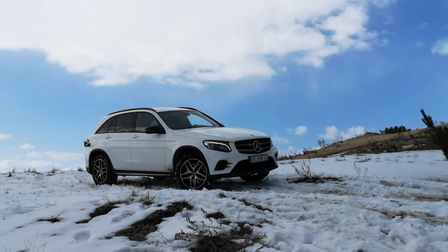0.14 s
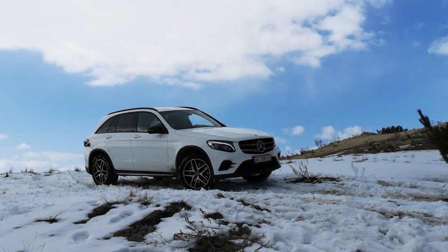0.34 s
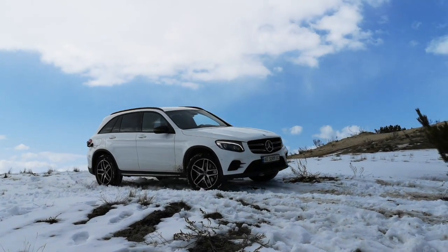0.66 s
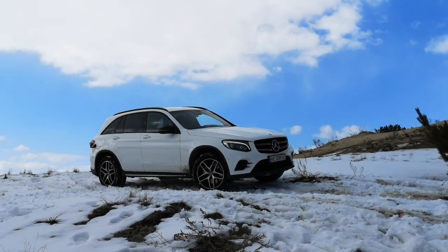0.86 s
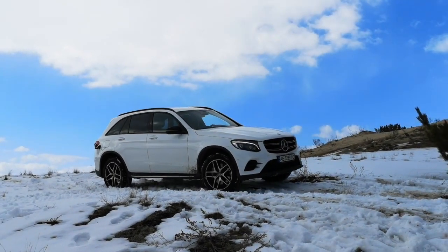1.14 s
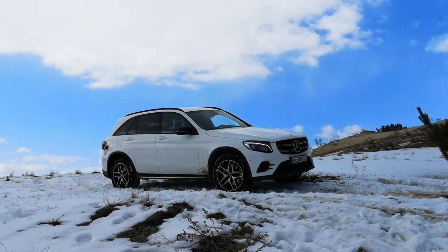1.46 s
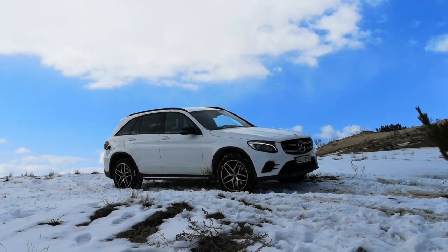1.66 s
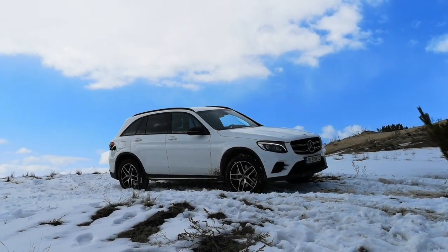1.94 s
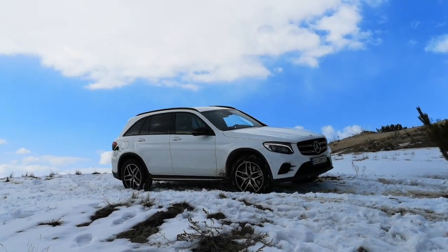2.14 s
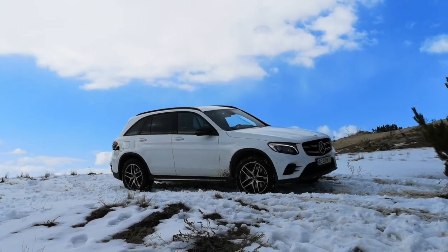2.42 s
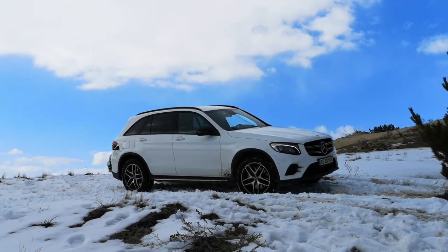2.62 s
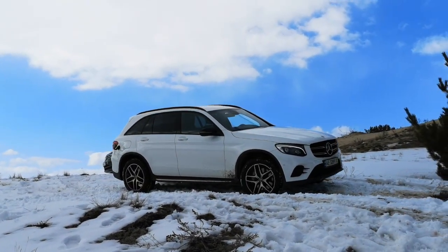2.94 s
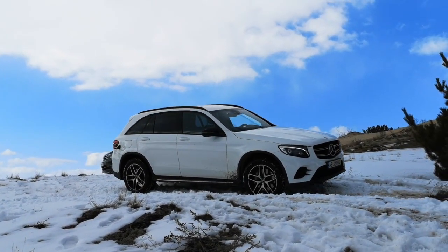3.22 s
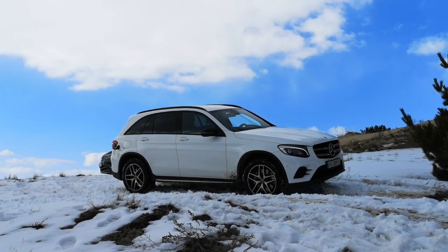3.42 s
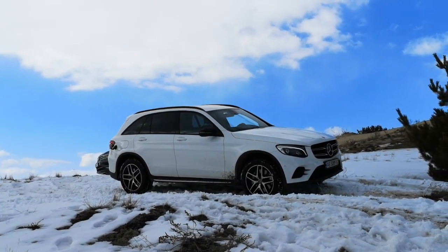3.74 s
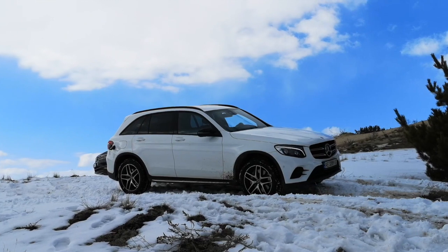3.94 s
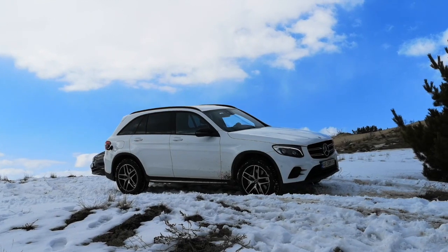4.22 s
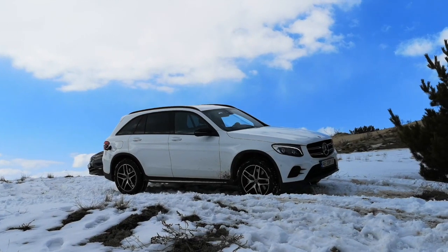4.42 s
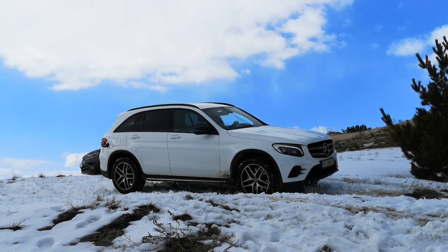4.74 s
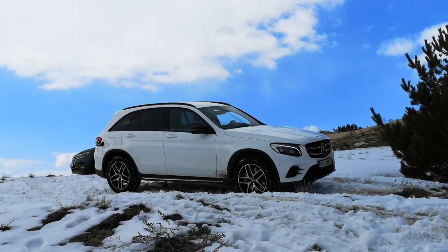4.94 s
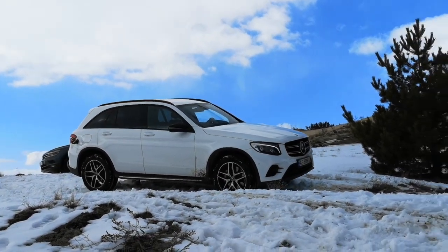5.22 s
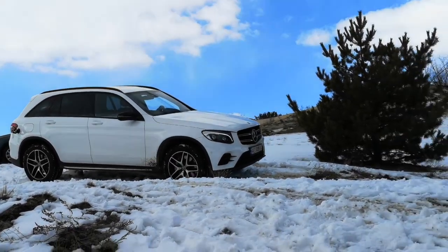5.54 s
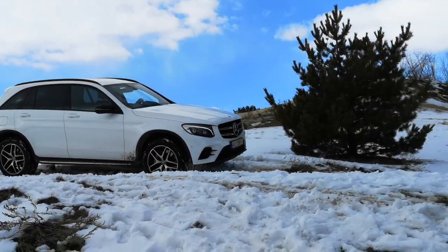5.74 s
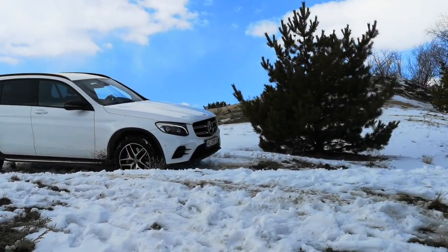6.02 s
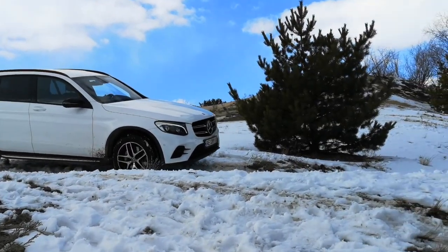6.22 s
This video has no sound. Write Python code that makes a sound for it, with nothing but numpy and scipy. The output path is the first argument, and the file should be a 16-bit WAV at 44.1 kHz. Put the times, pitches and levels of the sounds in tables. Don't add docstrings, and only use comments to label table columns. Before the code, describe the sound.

A diesel car idles with a throbbing exhaust and clatter on snow, wind buffets the microphone, and the engine revs briefly before more gusts.

```python
import sys
import numpy as np
from scipy import signal
from scipy.fft import rfft, irfft, next_fast_len
from scipy.io import wavfile
from scipy.ndimage import uniform_filter1d, map_coordinates

SR = 44100
rng = np.random.default_rng(int(sys.argv[2]) if len(sys.argv) > 2 else 0)


def elevation(decibels):
    levels = np.asarray(decibels, float)
    return 10 ** (levels / 20)


def store_wav(level_fs):
    pcm = np.round(np.clip(np.atleast_2d(level_fs), -1, 1) * 32767)
    wavfile.write(sys.argv[1], SR, pcm.T.astype(np.int16))


N = 280917

# (time [s], exhaust level [dB], how far abeam the bonnet is [0-1], knock hardness [dB])
ENGINE = [(0, -41.5, 0.37, -2), (.76, -43.5, 0.27, -4.5), (2, -45.5, 0, -3), (3, -46.5, 0, -4.5),
          (3.6, -45, 0, 0), (4.05, -48, 0.03, -3.5), (4.25, -44, 0, -1.5), (4.45, -42, 0, -6.5),
          (4.62, -57, 0, -4), (4.8, -46, 0, -1.5), (5.1, -53.5, 0.24, -3.5), (5.4, -52.5, 0.17, -5.5),
          (5.8, -47.5, 0.7, -3), (6.37, -47, 0.67, -3)]


def unit(x):
    return x / np.sqrt(np.mean(x ** 2) + 1e-20)


def along(points, hz):
    f, v = np.transpose(points)
    return np.interp(np.log(hz + 1), np.log(f + 1), v)


def curves(rows):
    s, *cols = np.transpose(rows)
    return [np.interp(np.arange(N) / SR, s, c) for c in cols]


def wobble(rate):
    coarse = np.arange(0, N + 32, 32)
    knots = rng.standard_normal(int(N * rate / SR) + 4)
    return np.interp(np.arange(N), coarse, map_coordinates(knots, [coarse * rate / SR]))


def filtered(x, response):
    m = next_fast_len(N + SR // 2)
    return irfft(rfft(x, m) * response(np.fft.rfftfreq(m, 1 / SR)), m)[..., :N]


def sides(db):
    return elevation(np.array([db / 2, -db / 2]))


def mode(f, centre, width):
    return 1j * f * width / (centre * centre - f * f + 1j * f * width)


def resonances(modes, lift_db):
    return lambda f: 1 + sum(elevation(db + lift_db) * mode(f, centre, width) for centre, width, db in modes)


def patches(depth_db):
    z = signal.stft(rng.standard_normal((2, N)), nperseg=512)[2]
    field = uniform_filter1d(rng.standard_normal(z.shape[1:]), size=3, axis=0)
    field = uniform_filter1d(field, size=8, axis=1)
    return signal.istft(z * elevation(depth_db * unit(field)), nperseg=512)[1][:, :N]


def ports(pair):
    # (frequency [Hz], left-right likeness [0-1])
    likeness = [(130, 0.81), (290, 0.6), (640, 0.51), (1410, 1), (2600, 0.57), (3400, 0.4), (6820, 0.013),
                (15000, 0.12)]
    # (frequency [Hz], left-right level [dB])
    lean = [(130, -17), (290, 4), (640, -9.5), (1410, 0), (2400, -8), (3600, 1), (6820, -1.5),
            (15000, -12.5)]
    # (frequency [Hz], phase by which left leads [rad])
    lead = [(100, -0.48), (600, -1.1), (1290, 0.86), (1810, -1), (2070, 0.0073), (2410, -1.1),
            (2670, -0.95), (4740, 1)]
    turn = lambda hz: np.arccos(np.clip(along(likeness, hz), -1, 1)) / 2
    mid, side = filtered(pair, lambda hz: np.array([np.cos(turn(hz)), np.sin(turn(hz))]))
    phase = lambda hz: np.exp(.5j * np.outer([1, -1], along(lead, hz)))
    skew = lambda hz: sides(along(lean, hz)) * phase(hz)
    return filtered(np.array([mid + side, mid - side]), skew)


def pushes():
    # (time [s], peak level [dB], width
    # [ms])
    gust_pushes = [(3.609, -44, 3.6), (3.625, -40, 3.8), (3.637, -38, 4.8), (4.288, -31.5, 3.9),
                   (4.307, -46, 3.2), (4.318, -36.0, 3.6), (4.36, -25, 3.8), (4.368, -24.5, 2.8),
                   (4.379, -41, 1.6), (4.386, -31, 3.0), (4.398, -34, 4.1), (4.412, -30.5, 3.0),
                   (4.424, -37.0, 4), (4.437, -28, 3.6), (4.451, -30.5, 3.9), (4.463, -25.0, 3.6),
                   (4.474, -31, 2.6), (4.487, -24.5, 4.2), (4.5, -37, 3.3), (4.515, -24.5, 5),
                   (4.541, -30.5, 3.6), (4.553, -50, 3.1), (4.574, -38, 4.2), (4.752, -42, 3.8),
                   (4.788, -53, 3.2), (4.826, -48, 3.7), (4.865, -52, 3.4), (5.284, -38.5, 4.1),
                   (5.338, -35.5, 3.1), (5.353, -43, 1.9), (5.368, -40, 2.3), (5.386, -40.0, 3.4),
                   (5.398, -39, 2), (5.418, -35.0, 4.4), (5.437, -31.5, 2.17), (5.445, -34.5, 2),
                   (5.464, -42, 2.3), (5.47, -33.5, 2.1), (5.481, -38, 3.1), (5.488, -30.5, 3.6),
                   (5.504, -30.5, 3.5), (5.523, -45, 2), (5.539, -40.0, 2.8), (5.554, -44, 3.0),
                   (5.565, -40.5, 2.7), (5.571, -31.5, 2.5), (5.582, -37.5, 2.4), (5.588, -34, 2.7),
                   (5.603, -34, 5.3), (5.619, -34.0, 2.9), (5.635, -34, 2.1), (5.646, -34.0, 2.6),
                   (5.662, -39, 4.4), (5.686, -45, 7.4), (5.7, -45, 3.5), (5.705, -33.5, 2.2),
                   (5.741, -28.5, 2.43), (5.765, -37.0, 2.8), (5.783, -30.0, 3.7), (5.793, -35, 2.2),
                   (5.806, -30.5, 3.2), (5.824, -31, 4.7), (5.837, -41, 3.0), (5.848, -38.0, 4.3),
                   (5.863, -39, 4.8), (5.872, -40, 4.6), (5.889, -31.5, 3.9), (5.9, -38, 3),
                   (5.918, -39.0, 1.9), (5.929, -33.5, 3.2), (5.943, -41, 3.6), (5.983, -42, 4.3),
                   (6.024, -44, 3.9), (6.062, -48, 4.2), (6.074, -38, 2.9), (6.09, -42.0, 3.6),
                   (6.101, -48, 6), (6.142, -37, 2.8), (6.164, -33, 2.5), (6.183, -29, 2.8),
                   (6.194, -40, 2.2), (6.206, -31.5, 3), (6.227, -31.5, 2.2), (6.233, -39.0, 1.9),
                   (6.245, -33, 3), (6.258, -36, 3), (6.263, -26, 2.63), (6.276, -39, 2), (6.281, -36, 2.3),
                   (6.302, -35.5, 2.5), (6.323, -36, 2.4), (6.342, -39, 2.4)]
    s, db, width_ms = np.array(gust_pushes).T[:, :, None]
    at = np.round(s * SR).astype(int) + np.arange(-SR // 40, SR // 40)
    u = (at / SR - s) / (width_ms * 0.00078)
    suction = -elevation(db - 1.0) * (1 - u * u) * np.exp(-u * u / 2)
    return np.bincount(at.ravel(), suction.ravel(), N + SR)[:N]


def thumps():
    # (time [s], peak level [dB], start pitch [Hz], 60 dB decay time [s])
    eddies = [(0.465, -34, 226, 0.044), (1.202, -23, 219, 0.031), (2.602, -56, 323, 0.3),
              (3.104, -41.5, 275, 0.067), (3.249, -43, 286, 0.071), (3.305, -32, 225, 0.027),
              (3.37, -38.5, 282, 0.082), (3.574, -33.5, 301, 0.1), (3.584, -25.5, 243, 0.045),
              (3.744, -26, 173, 0.042), (3.915, -28.5, 161, 0.061), (4.332, -21.5, 294, 0.07),
              (4.358, -28, 170, .04), (4.505, -45.5, 339, 0.51), (4.449, -31.5, 304, 0.16),
              (.562, -47, 304, 0.042), (3.035, -45, 280, .05), (3.125, -44.5, 233, 0.13)]
    out, t = np.zeros(N + SR), np.arange(SR // 3) / SR
    for s, db, hz, t60 in eddies:
        pitch = hz * (0.567 + 0.491 * np.exp(-t / 0.013))
        swell = elevation(-60 * t / t60) * (1 - np.exp(-(t / 0.0044) ** 2))
        out[round(s * SR):][:len(t)] += elevation(db - 2.5) * swell * np.sin(2 * np.pi * np.cumsum(pitch) / SR)
    return out[:N]


def wind():
    # (time [s], level [dB])
    strength = [(0, -83), (.35, -62), (.72, -64.5), (1.25, -64), (2.15, -69), (2.62, -66.5), (3.15, -62.5),
                (3.46, -70.5), (3.85, -61), (4.05, -81), (4.26, -61), (4.45, -45), (4.6, -63.5),
                (5.17, -54), (5.28, -60.5), (5.45, -50), (5.95, -58), (6.3, -63.5)]
    # (frequency [Hz], density [dB per Hz])
    buffet_spectrum = [(40, -2), (80, 4), (130, -1), (190, -5), (260, -11.5), (330, -29.5), (500, -61),
                       (800, -59.5)]
    # (frequency [Hz], density [dB per Hz])
    deep_spectrum = [(4, -11), (12, -2), (25, 4), (45, 15.5), (80, -14), (110, -25), (200, -76)]
    # (frequency [Hz], width [Hz], level [dB])
    cavity = [(178.7, 8.4, 5.5)]
    # (time [s], level [dB])
    small_eddies = [(0.0, -71), (0.075, -61.5), (0.15, -75.5), (0.29, -70), (0.5, -73.5), (0.82, -76.5),
                    (1.15, -70.5), (1.35, -76), (2.2, -80), (2.62, -67), (2.8, -82), (3.19, -71),
                    (3.39, -84), (4.17, -80), (4.43, -68), (4.72, -73.5), (5.9, -70), (6.37, -69)]
    # (frequency [Hz], density [dB per Hz])
    fine_spectrum = [(150, -40), (230, -6), (300, -0.5), (370, -2), (450, -18.5), (600, -13), (900, -67)]
    deep_in_breeze_db, deep_growth, breeze_db = -8, 1.25, -60
    buffet_db, = curves(strength)
    deep_db = deep_in_breeze_db + (deep_growth - 1) * (buffet_db - breeze_db)
    lumps = elevation(3.2 * wobble(24))
    buffet, stray = filtered(lumps * rng.standard_normal((2, N)), lambda hz: elevation(along(buffet_spectrum, hz)))
    deep = filtered(lumps * rng.standard_normal(N), lambda hz: elevation(along(deep_spectrum, hz)))
    both = elevation(buffet_db + 5.5) * (unit(buffet) + elevation(deep_db) * unit(deep)) + pushes()
    both = filtered(both, resonances(cavity, lift_db=-7.0))
    fine_lumps = elevation(3.7 * wobble(30)) * rng.standard_normal(N)
    fine = filtered(fine_lumps, lambda hz: elevation(along(fine_spectrum, hz)))
    both = both + elevation(curves(small_eddies)[0] - 1.0) * unit(fine)
    stray = filtered(unit(stray), lambda hz: np.minimum(0.07 + (hz / 140) ** 2, 2.5))
    stray = elevation(buffet_db - 20.5) * stray
    pair = both * elevation(np.array([[-.05], [.05]])) + np.outer([1, -1], stray)
    return pair + np.outer(sides(-1.5), thumps())


def snaps():
    # (time [s], peak level [dB], pitch [Hz], left-right level [dB])
    twigs = [
        (1.055, -57, 7100, -2.0),
        (1.388, -53, 9120, -8),
        (1.7194, -68, 4590, -1.5),
        (5.0095, -61, 8200, 0),
        (6.0097, -72, 7980, 0),
    ]
    out, t = np.zeros((2, N + SR)), np.arange(SR // 50) / SR
    for s, db, hz, pan_db in twigs:
        band = signal.butter(4, [0.7 * hz, 1.24 * hz], "bandpass", fs=SR, output="sos")
        noise = signal.sosfilt(band, rng.standard_normal((2, len(t))))
        tick = np.sin(2 * np.pi * hz * t) + 2.5 * noise
        swell = elevation(-60 * t / 0.012) * (1 - np.exp(-t / 0.00072))
        out[:, round(s * SR):][:, :len(t)] += elevation(db + 2.5) * sides(pan_db)[:, None] * swell * tick
    return out[:, :N]


def hard_pops():
    # (time [s], pop level [dB], spray level [dB], spray top [Hz])
    pop_rows = [
        (.505, -70, -43.5, 2480),
        (4.168, -68, -43.5, 2900),
        (4.403, -60, -37, 3000),
        (4.483, -62, -39, 3000),
        (4.937, -72, -45, 2580),
        (5.094, -68, -40, 2600),
        (6.0092, -50, -45, 2800),
        (6.1318, -33.5, -43.5, 7500),
    ]
    out, t = np.zeros((2, N + SR)), np.arange(SR // 40) / SR
    for s, pop_db, spray_db, top_hz in pop_rows:
        pop = (t / 0.0013 * np.exp(1 - t / 0.0013)) ** 2
        noise = rng.standard_normal(len(t)) + 0.7 * rng.standard_normal((2, len(t)))
        band = signal.butter(3, [1450, top_hz], "bandpass", fs=SR, output="sos")
        spray = unit(signal.sosfilt(band, noise)) * elevation(-60 * t / 0.022) * (1 - np.exp(-t / 0.00058))
        out[:, round(s * SR):][:, :len(t)] += elevation(pop_db) * pop + elevation(spray_db - 5.0) * spray
    return filtered(out[:, :N], lambda hz: 1j * hz / (120 + 1j * hz))


def squeak():
    # (time [s], length [s], start pitch [Hz], level [dB])
    chirps = [
        (2.583, .013, 6400, -68),
        (2.6, .008, 6250, -71),
        (2.612, 0.021, 6450, -70.5),
    ]
    rise_hz_per_s = 28000
    out = np.zeros((2, N))
    for s, length, hz, db in chirps:
        t = np.arange(round(length * SR)) / SR
        swell = np.sqrt(np.sin(np.pi * t / length))
        chirp = swell * np.sin(2 * np.pi * (hz + rise_hz_per_s * t / 2) * t)
        out[:, round(s * SR):][:, :len(t)] += elevation(db) * np.outer(sides(-8), chirp)
    return out


def whistle(hz, swells, flutter_db, flip):
    t = np.arange(N) / SR
    step = t[::32]
    level = 0
    for k, (s, width, *db) in enumerate(swells):
        swell = np.exp(-((step - s) / width) ** 2 / 2)
        level = level + flip ** k * np.outer(elevation(np.array(db)), swell)
    level = np.array([np.interp(t, step, port) for port in level])
    flutter = elevation(flutter_db * (wobble(35) + 0.18 * np.array([wobble(34.2), wobble(25)])))
    tone = np.sin(2 * np.pi * np.cumsum(hz + 5 * wobble(40)) / SR)
    return level * flutter * np.sqrt(2) * tone


def brakes():
    # (centre [s], width [s], left [dB], right [dB])
    high_swells = [(.87, 0.031, -94, -71), (1.04, .03, -97, -78), (1.2, 0.018, -89, -65),
                   (1.245, 0.026, -86, -54.5), (1.3, .012, -80, -56), (1.352, 0.02, -71, -53.5),
                   (1.452, 0.026, -73, -51), (1.517, 0.021, -68, -47.5), (1.575, 0.021, -62, -52.5),
                   (1.655, 0.014, -65, -46), (1.705, .018, -61, -53), (1.77, 0.013, -90, -71),
                   (2.44, 0.033, -84, -62.5), (2.52, 0.018, -64, -57), (2.58, 0.055, -67, -57.5),
                   (2.695, 0.048, -63, -49.5), (2.81, 0.022, -80, -65), (2.95, 0.081, -88, -75),
                   (3.15, 0.047, -75, -52.5), (3.272, .022, -68, -49), (3.34, 0.019, -94, -69),
                   (5.277, 0.017, -56, -80), (5.315, 0.026, -85, -57.5)]
    # (centre [s], width [s], left [dB], right [dB])
    low_swells = [
        [(1.04, .04, -92, -80), (1.115, .025, -83, -66.5), (1.215, 0.017, -82, -65)],
        [(3.13, .03, -84, -93), (3.2, 0.026, -58, -69), (3.28, 0.034, -44, -61), (3.365, 0.023, -55.5, -63)],
        [(6.28, .012, -86, -69), (6.325, 0.023, -75, -56)],
    ]
    high = whistle(14697, high_swells, flutter_db=1.5, flip=-1)
    low_hz = 11322, 11295, 11605
    low = sum(whistle(hz, rows, flutter_db=.8, flip=1) for hz, rows in zip(low_hz, low_swells))
    return high + low


def slides():
    # (peak time [s], level [dB], 20 dB build-up [s], 20 dB decay [s])
    slips = [
        (0, -66, .1, 0.14),
        (0.331, -61.5, 0.085, 0.034),
        (.7, -69, 0.68, 0.039),
        (5.27, -71, 0.3, 0.45),
        (5.5, -65, 0.29, 0.18),
        (5.59, -58.5, 0.12, 0.17),
        (5.655, -70, 0.23, 0.015),
        (6.37, -58, 0.15, 0.091),
    ]
    s, db, build, die = np.transpose(slips)[:, :, None]
    late = np.arange(N) / SR - s
    return elevation(db - 20 * np.maximum(-late / build, late / die)).sum(axis=0)


def sliding_tyres():
    # (frequency [Hz], density [dB per Hz])
    powder = [(2500, -2.5), (4200, -3), (5490, 0.5), (6590, -1.5), (8360, 3), (9400, -2), (10600, -8),
              (11900, -15), (15000, -20)]
    # (frequency [Hz], width [Hz], level [dB])
    tread = [(5300, 470, -1.5), (9460, 610, 2.5)]
    grooves = resonances(tread, lift_db=0)
    hiss = filtered(patches(depth_db=1.5), lambda hz: elevation(along(powder, hz)) * grooves(hz))
    return slides() * unit(hiss)


def firings():
    # (time [s], firing rate [firings per s])
    firing_rate = [(0, 24.38), (.5, 24.85), (1.2, 25.09), (2, 25.11), (3, 25.0), (3.9, 25.14), (4.08, 25.3),
                   (4.22, 29.5), (4.33, 38), (4.49, 39.7), (4.56, 31.5), (4.68, 26), (4.8, 26.6),
                   (5.1, 24.83), (5.5, 24.95), (5.9, 25.08), (6.37, 25.15)]
    pulse_at = .711
    turns = np.cumsum(curves(firing_rate)[0]) / SR
    return turns - turns[round(pulse_at * SR)]


def knock(lead, decay, depth_db, scatter_db):
    turns = firings() + lead
    since = turns % 1
    index = (turns - since - np.floor(turns[0])).astype(int)
    scatter = elevation(scatter_db * rng.standard_normal(index.max() + 1))[index]
    uneven = elevation(1.3 * (index % 2 - 2.0))
    shape = np.exp(-since / decay) * (1 - np.exp(-since / .16)) ** 2
    return np.sqrt(1 + (elevation(depth_db + curves(ENGINE)[2]) * scatter * uneven * shape) ** 2)


def beamed(x):
    # (frequency [Hz], width [Hz], level [dB], facing at [s], for [s])
    panels = [(916, 8.5, 6, 0.83, 1.44), (1650, 47, -6.5, 0.29, 0.43), (2090, 88, 2.5, 0.2, 0.83),
              (1510, 140, -6.5, 1.76, 0.87), (1997, 65, -1, 2.1, 0.44), (2630, 57, 2, 1.5, 0.31),
              (2090, 70, 5.5, 4.05, 1.04), (2393, 26, 6.5, 4.2, 0.65), (3380, 50, 5, 3.6, 1),
              (1860, 47, 1, 4.43, 0.13), (2970, 600, -20, 4.47, 0.3), (2270, 150, 1, 4.45, 0.046),
              (1853, 94, 0.5, 5.6, 0.66), (1095, 89, 4, 5.71, 0.21), (1560, 31, -1, 5.4, 0.4),
              (2100, 37, 7, 5.52, 0.056)]
    f, t, z = signal.stft(x, SR, nperseg=4096)
    ring = 0
    for centre, width, db, s, span in panels:
        facing = np.exp(-((t - s) / span) ** 2 / 2)
        ring = ring + np.outer(mode(f, centre, width), elevation(db) * facing)
    return signal.istft(z * (1 + ring), SR, nperseg=4096)[1][:, :N]


def clatter(abeam):
    # (frequency [Hz], density [dB per Hz])
    ahead_spectrum = [(210, 0.5), (350, -2), (520, -4.5), (832, 0), (896, 0), (1010, 0), (1040, -2.5),
                      (1220, -2), (1500, -0.5), (2200, 0.5), (2690, 2), (4220, -14.5), (4500, -29),
                      (5850, -55), (9900, -120)]
    # (frequency [Hz], density [dB per Hz])
    beside_spectrum = [(210, -0.5), (350, -12.5), (597, -14), (732, -9), (945, -12), (1110, -9),
                       (1370, -3.5), (1850, -2), (2370, -9.5), (2610, -17), (3100, -30), (3410, -37),
                       (4500, -25), (5850, -45), (9900, -120)]
    # (frequency [Hz], width [Hz], level [dB])
    block_modes = [(1092, 16.5, 6.5), (1662, 370, 5.5), (2187, 250, -2.5)]
    block = resonances(block_modes, lift_db=-.5)
    beats = knock(lead=.29, decay=.25, depth_db=21.5, scatter_db=.5) * patches(depth_db=.6)
    ahead = unit(filtered(beats, lambda hz: elevation(along(ahead_spectrum, hz)) * block(hz)))
    beside = unit(filtered(beats, lambda hz: elevation(along(beside_spectrum, hz))))
    return unit(beamed((1 - abeam) * ahead + abeam * beside))


def fuel_hiss():
    # (frequency [Hz], density [dB per Hz])
    hiss_spectrum = [(2060, -27), (3500, 3), (4340, -3.5), (4720, -2.5), (5700, 0.5), (6450, -3.5),
                     (7140, -2.5), (8860, -0.5), (9980, -13.5), (10500, -37), (13600, -16), (15500, -30),
                     (22000, -120)]
    # (frequency [Hz], width [Hz], level [dB])
    fuel_lines = [(4675, 140, 2.5), (5790, 98, -7), (6480, 140, -6), (7100, 136, 2), (7600, 84, 3.5),
                  (9120, 260, -1)]
    lines = resonances(fuel_lines, lift_db=1.5)
    puffs = knock(lead=.36, decay=.25, depth_db=20.5, scatter_db=1) * patches(depth_db=1.5)
    return unit(filtered(puffs, lambda hz: elevation(along(hiss_spectrum, hz)) * lines(hz)))


def engine_noise():
    # (time [s], level [dB])
    load = [(0, -0.5), (.34, 1.5), (2.16, -1.5), (3.3, .5), (3.5, -2.5), (4.13, -0.5), (4.27, 5),
            (4.35, 12.5), (4.45, 13.5), (4.545, 10.5), (4.58, 0.5), (5.5, 2.5), (5.6, 7), (5.68, 1.5),
            (5.8, 3.5), (6.05, 0), (6.25, 4), (6.37, 2)]
    # (frequency [Hz], left-right level [dB])
    lean_abeam = [(400, -1.5), (770, 10.5), (1200, -3.5), (1850, -8.5), (2300, -3.5), (2750, 11), (3400, 0),
                  (4200, 5), (6000, 3)]
    load_db, = curves(load)
    abeam = np.clip(curves(ENGINE)[1], 0, 1)
    block = elevation(-60 + load_db) * clatter(abeam)
    fuel = elevation(-72 + 1.096 * load_db) * fuel_hiss()
    heard = ports(block + fuel + sliding_tyres())
    return (1 - abeam) * heard + abeam * filtered(heard, lambda hz: sides(along(lean_abeam, hz)))


def exhaust():
    # (multiple of the firing rate, level [dB])
    orders = [(0.5, -17), (1, -5.5), (2, -6.5), (2.5, -21), (3, 0), (3.5, -29), (4, -11), (5, -25),
              (6, -24), (7, -25), (7.5, -27), (8, -32), (9, -32)]
    # (time [s], level [dB])
    boom = [(0, 1), (.4, 0.5), (1, 1), (1.6, 1), (2.2, 0), (2.8, 0.5), (3.3, -0.5), (3.6, -2), (3.9, 1),
            (4.2, -1), (4.6, 0.5), (4.9, 0.5), (5.3, -1), (5.7, -1.5), (6.37, 0.5)]
    silencer_order, silencer_lag, second_lag = 3, .9, .5
    turns, level_db = firings(), curves(ENGINE)[0]
    boom_db, = curves(boom)
    steady_db = .35 * (level_db.mean() + 3 - level_db)
    waves = 0
    for k, order_db in orders:
        db = order_db + (k == 1) * steady_db + (k == silencer_order) * boom_db + 0.26 * wobble(3.92)
        lag = silencer_lag * max(k - silencer_order, 0) + (k == 2) * second_lag
        waves = waves - elevation(db) * np.cos(2 * np.pi * k * turns - lag + 0.033 * wobble(5.7))
    return elevation(level_db - 0.5) * waves


def scene():
    return wind() + snaps() + hard_pops() + squeak() + brakes() + engine_noise() + exhaust()


def low_pass(x):
    return signal.sosfilt(signal.butter(12, 15640, fs=SR, output="sos"), x)


def record(dry):
    # (frequency [Hz], density [dB per Hz])
    self_noise = [(3000, -40), (8000, -53), (10200, 6), (11000, 4.5), (14000, 3), (15600, 6.5)]
    mono_hz, slips_per_s, slip_over = 170, 14, 1.2
    hiss = unit(filtered(rng.standard_normal(dry.shape), lambda hz: elevation(along(self_noise, hz))))
    held = 1 - np.clip(3 * (wobble(slips_per_s) - slip_over), 0, 1)
    bass_difference = filtered(dry[0] - dry[1], lambda hz: 1 / (1 + (hz / mono_hz) ** 8))
    dry = dry - np.outer([.5, -.5], held * bass_difference)
    return low_pass(dry + elevation(-80.5) * hiss - .0003)


dry = scene()
out = record(dry)
store_wav(out)
```